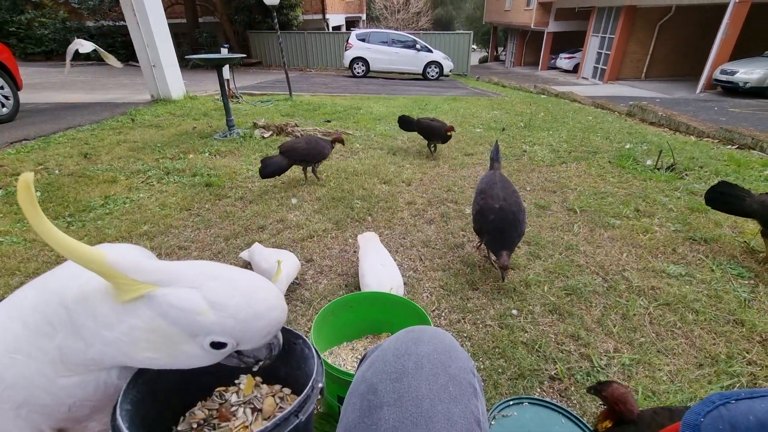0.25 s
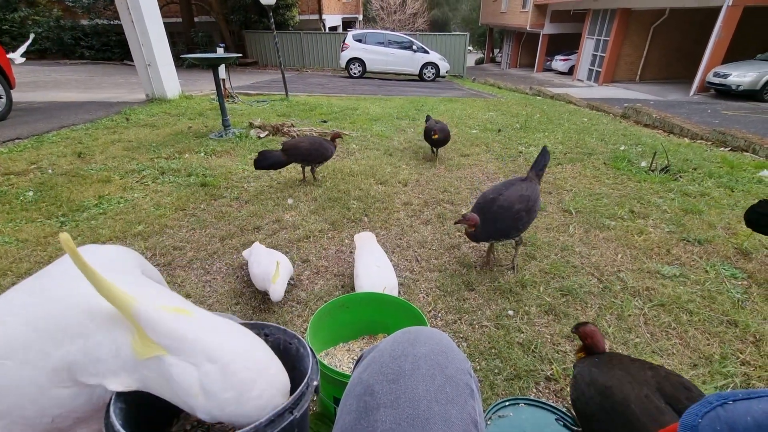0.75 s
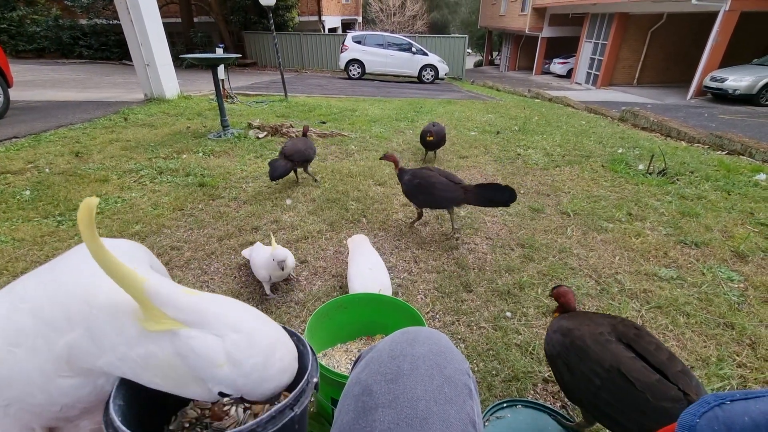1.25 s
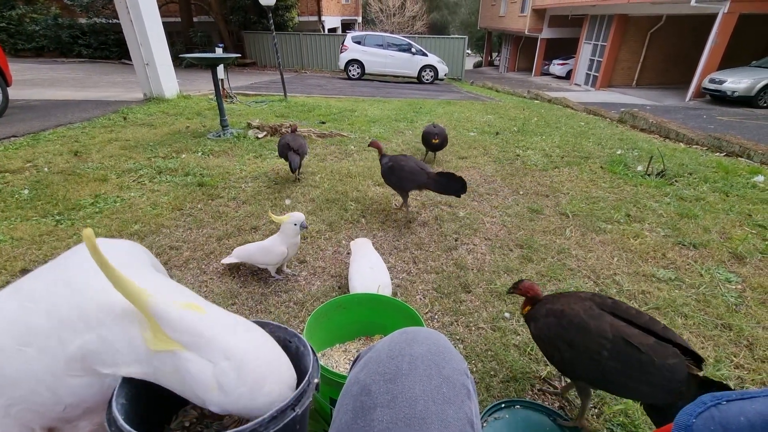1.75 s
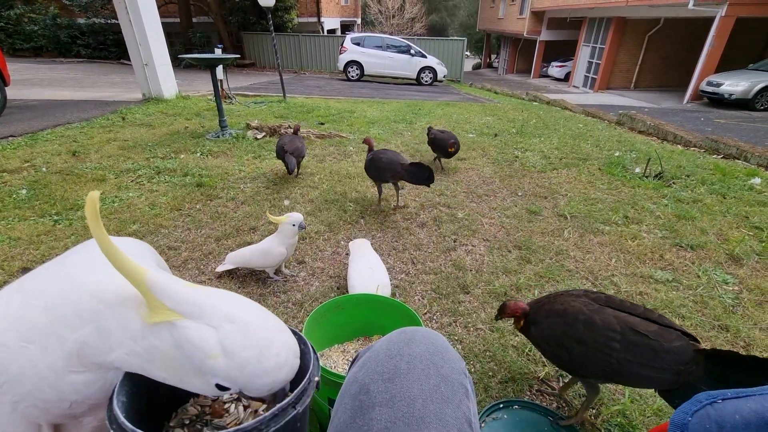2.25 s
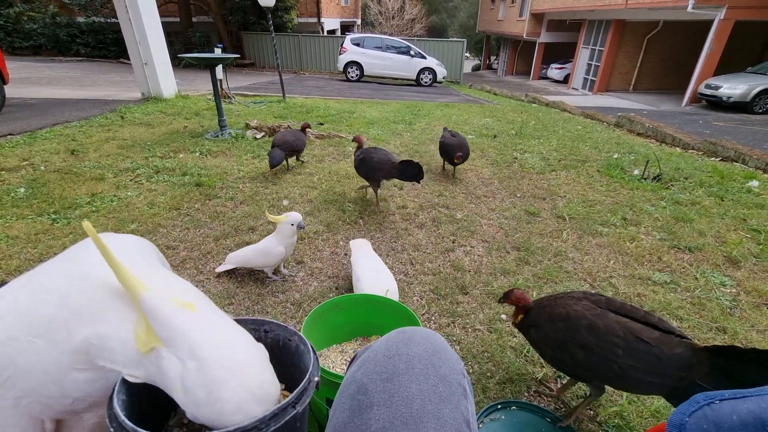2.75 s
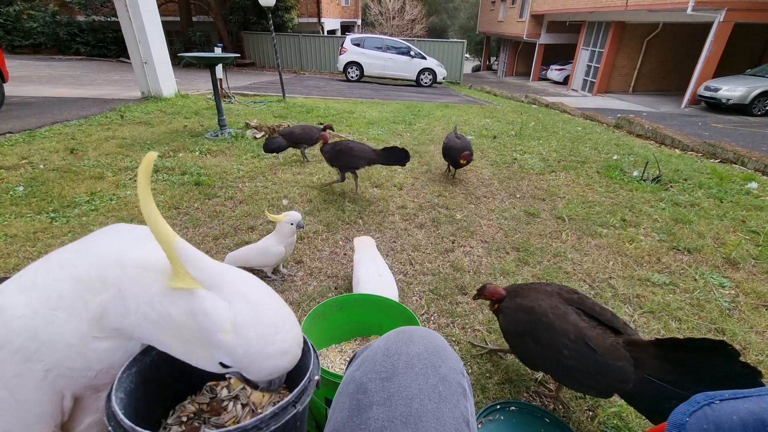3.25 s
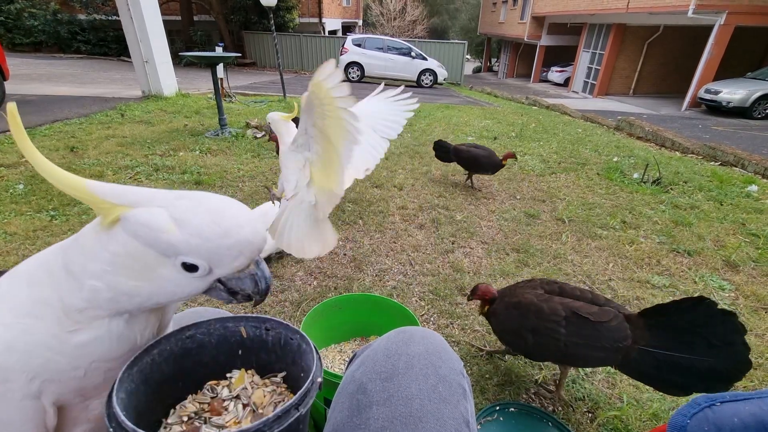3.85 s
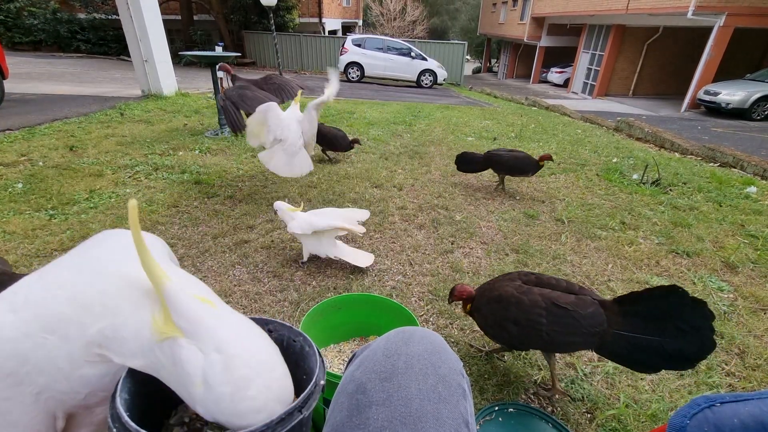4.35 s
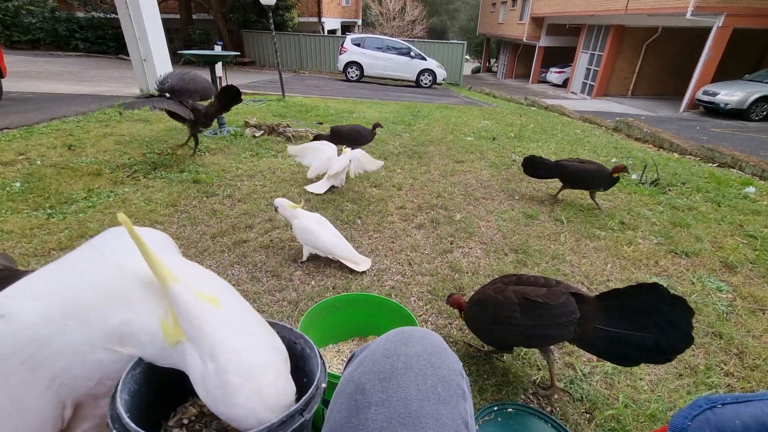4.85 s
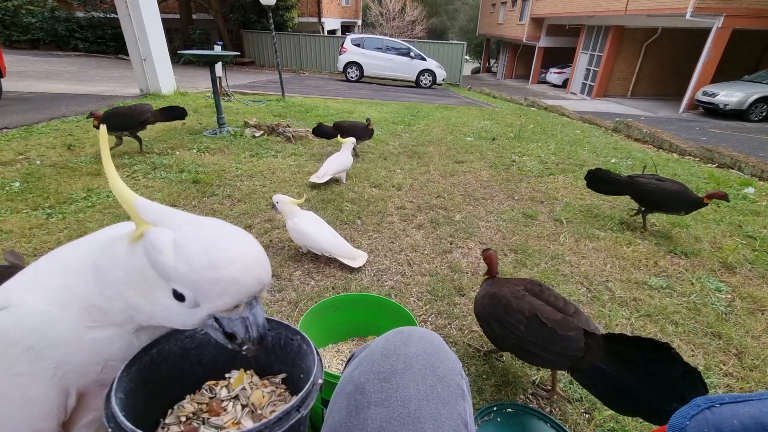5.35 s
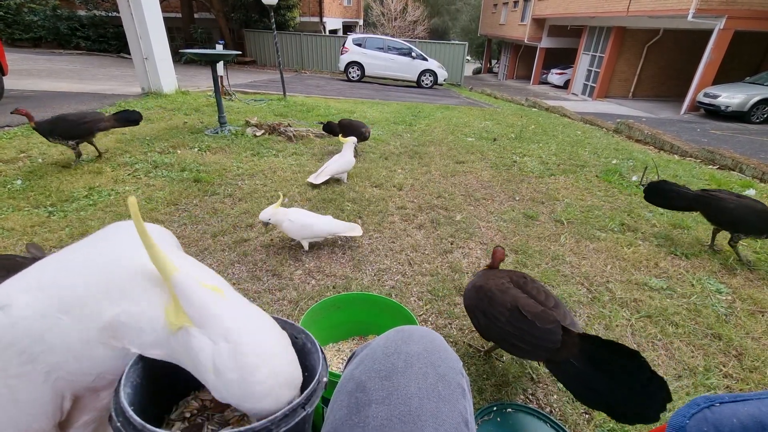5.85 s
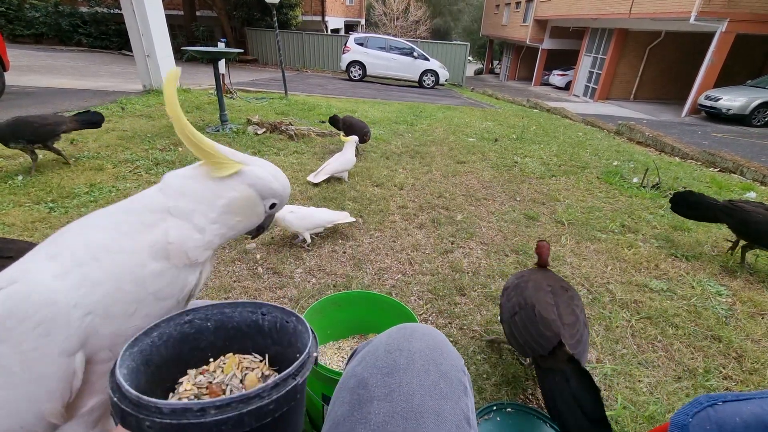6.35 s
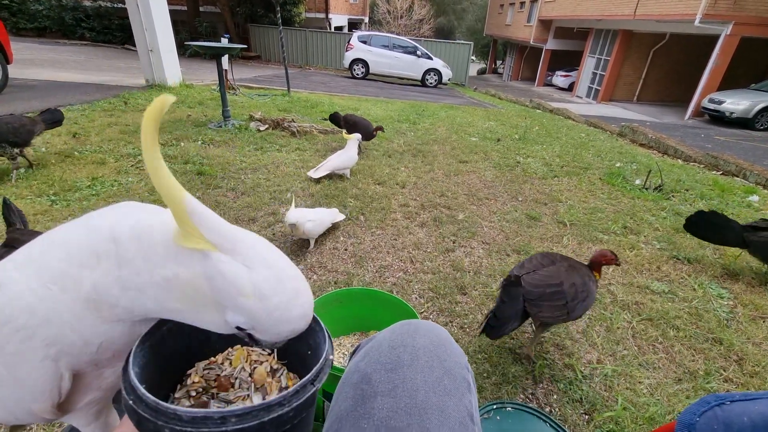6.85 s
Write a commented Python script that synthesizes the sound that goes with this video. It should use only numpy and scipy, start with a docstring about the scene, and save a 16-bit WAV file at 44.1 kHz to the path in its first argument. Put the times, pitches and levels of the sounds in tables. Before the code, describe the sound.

Sharp irregular beak clicks and splitting husks very near, brief seed rustles, a short wing flutter, distant hoarse parrot calls and low traffic rumble.

```python
"""A garden between houses: close by, a cockatoo cracks seeds and digs through a plastic bucket of them.
Cracks are bursts of noise ringing the beak or husk; digging is countless tiny seed knocks; bumps ring the bucket.
Another cockatoo flaps off across the lawn, made of rustling noise and soft puffs of air.
Birds screech and whistle in gliding tones, echoed by the houses.
Distant traffic rumbles underneath as shaped noise, with an engine drone and a faint machine whine."""
import sys
import numpy as np
from scipy import signal
from scipy.fft import rfft, irfft, next_fast_len
from scipy.io import wavfile

SR = 44100
rng = np.random.default_rng(int(sys.argv[2]) if len(sys.argv) > 2 else 0)


def transcribe(u):
    """Save the signal u as a 16-bit wav file named by the first command-line argument.

    u: samples, shape (n,) or (channels, n), limited to [-1, 1]; the rate is SR.
    q: integer samples, one column per channel.
    """
    v = np.clip(np.atleast_2d(u).T, -1, 1)
    q = np.round(v * 32767).astype(np.int16)
    wavfile.write(sys.argv[1], SR, q)


N = 312669
TIME = np.arange(N) / SR


def from_db(db):
    """Turns decibels into a gain."""
    return 10 ** (np.asarray(db) / 20)


def rms_one(x):
    """Scales a sound to an average strength (RMS) of 1."""
    return x / np.sqrt(np.mean(x ** 2) + 1e-20)


def level(rows):
    """Gain over time, drawn between rows of time and level."""
    return from_db(np.interp(TIME, *np.transpose(rows)))


def at_hz(points, hz):
    """Reads a spectrum in dB along a log-frequency axis."""
    corner, db = np.transpose(points)
    return np.interp(np.log(hz + 1), np.log(corner), db)


def colour(x, spectrum):
    """Shapes a steady sound by a spectrum."""
    size = next_fast_len(N)
    hz = np.arange(size // 2 + 1) * SR / size
    shaped = rfft(x, size) * from_db(at_hz(spectrum, hz))
    return irfft(shaped, size)[..., :N]


def resonate(x, hz, width_hz):
    """Keeps a band around one pitch, with steep skirts, like a broad resonance."""
    edges = np.clip([hz - width_hz / 2, hz + width_hz / 2], 15, .48 * SR)
    return signal.sosfilt(signal.butter(2, edges, "band", fs=SR, output="sos"), x)


def drift(rate):
    """Chance wandering with a spread of 1, given new values `rate` times a second."""
    knots = rng.standard_normal(4000)
    return rms_one(np.interp(TIME * rate, np.arange(len(knots)), knots))


def add(track, s, sound):
    """Mixes a short sound into a track at a time in seconds."""
    start = max(round(s * SR), 0)
    track[..., start:start + sound.shape[-1]] += sound[..., :N - start]


def swell(s, half_s):
    """A bell-shaped rise and fall about a moment."""
    return np.exp(-.5 * np.minimum(np.abs(TIME - s) / half_s, 10) ** 2)


def panned(x, pan_db):
    """Makes a distant source louder on one side; pan_db is left minus right."""
    return x * from_db([[pan_db / 2], [-pan_db / 2]])


MIC_LAG_MS = 0.3244


def near(x, pan_db):
    """Places a close source: the right side hears it a moment later; pan_db is left minus right."""
    left, right = np.broadcast_to(x, (2, N))
    late_right = np.interp(TIME - MIC_LAG_MS / 1000, TIME, right)
    return np.array([left * from_db(pan_db / 2), late_right * from_db(-pan_db / 2)])


def echoes(x, t60, gap_s, top_hz):
    """Scattered reflections from walls and ground: dulled, fading 60 dB in t60 seconds, unlike on each side."""
    t = TIME[:SR]
    fade_in = np.clip(t / gap_s - 1, 0, 1)   # nothing comes back before the gap
    tail = rng.standard_normal((2, SR)) * from_db(-60 * t / t60) * fade_in
    tail /= np.sqrt(np.sum(tail ** 2) / 2)
    dull = signal.sosfilt(signal.butter(2, min(top_hz, .45 * SR), fs=SR, output="sos"), x + 1e-18)
    return signal.fftconvolve(dull[None], tail, axes=1)[:, :N]


# the air of the street, strongest in the bass: [pitch_hz, level_db per Hz]
STREET_SPECTRUM = [(13, -53), (22, -16), (48, -6), (92, -1.5), (143, -9.5), (229, -9), (263, -10.5),
                   (366, -13), (469, -13.5), (1270, -23.5), (1670, -30.5), (2740, -33), (4030, -48.5),
                   (6100, -49.5), (16000, -91)]
# how much the two sides of the street differ: [pitch_hz, difference_db relative to the shared part]
STREET_WIDTH = [(30, -11), (90, -14.5), (200, -14.5), (380, -4), (700, 2), (1290, 5), (2380, 1.5),
                (4400, 1), (15000, 8)]
# engines droning far off, before drone_db is added: [time_s, level_db]
DRONE_LEVELS = [(0, -33), (.5, -40), (1.2, -41.5), (1.9, -39.5), (2.3, -44), (2.7, -51), (3.5, -41),
                (4.3, -53), (4.7, -60), (5.9, -46), (7.09, -45)]
STREET_DB = -41   # the shared part of the traffic wash, before the left-right balance


def street(drone_db, whine_db):
    """Wide traffic noise, far engines heard as narrow bands of noise, and a thin wavering whine."""
    mid, side, engines = rng.standard_normal((3, N))
    mid = colour(mid, STREET_SPECTRUM)
    side = colour(colour(side, STREET_SPECTRUM), STREET_WIDTH)
    both_sides = (mid + side * [[1], [-1]]) / np.std(mid)
    wash = from_db(STREET_DB + .5 * drift(5)) * both_sides
    hum = resonate(engines, 65.0, 3.8) + 0.26 * resonate(engines, 88.6, 39.0)
    drone = from_db(drone_db) * level(DRONE_LEVELS) * rms_one(hum)
    whine = from_db(whine_db) * rms_one(resonate(rng.standard_normal((2, N)), 1246, 4.1))
    return (wash + drone + whine) * from_db([[-.7], [.7]])   # a little louder on the right


# the beak digging into the seeds: [start_s, length_s, level_db]
DIGS = [(0.709, 0.011, -46.5), (0.853, 0.0085, -39.5), (2.059, 0.0099, -50.5), (2.921, 0.018, -43.5),
        (2.96, 0.062, -49.5), (3.204, 0.011, -46), (4.346, 0.014, -41), (5.065, 0.0066, -50),
        (5.88, 0.21, -56.5), (6.06, 0.015, -45.5), (6.13, .025, -42), (6.106, 0.018, -33),
        (6.17, 0.082, -38), (6.295, 0.066, -59.5)]
DIG_ATTACK_S, DIG_RELEASE_S = 0.0099, 0.016
SETTLE_DB, SETTLE_S = -15, 0.07   # disturbed seeds go on sliding after a dig
RESTING_DB = -70   # the bird shifting on the rim between digs


def digging():
    """How hard the seeds are stirred: each dig swells, holds and stops, then the seeds settle."""
    power = from_db(RESTING_DB) ** 2
    for s, length, db in DIGS:
        before, after = np.clip(s - TIME, 0, 1), np.clip(TIME - s - length, 0, 2)
        settling = from_db(SETTLE_DB) * np.exp(-after / SETTLE_S)
        release = np.maximum(np.exp(-after / DIG_RELEASE_S), settling)
        power = power + (from_db(db) * np.exp(-before / DIG_ATTACK_S) * release) ** 2
    return np.sqrt(power)


# overall tone of the moving seeds: [pitch_hz, level_db per Hz]
SEED_SPECTRUM = [(300, 14.5), (700, 4.5), (1400, -4), (2500, 7), (4200, 5.5), (6500, 4), (9500, -14.5),
                 (12000, -1.5), (15000, -8)]


def husks(per_s, spread_db, clump_db, rub, count):
    """Seeds knock together over a steady rub; each kind of seed ticks at a pitch of its own."""
    out = np.zeros((2, N))
    for hz in np.geomspace(400, 15000, count):
        sizes = from_db(spread_db * np.minimum(rng.exponential(1, N), 3)) * rng.choice([-1, 1], N)
        hits = sizes * (rng.random(N) < per_s / SR)
        knocks = rms_one(hits * (1 + 6 * rng.standard_normal((2, N))))   # strengths differ on each side
        out += resonate(knocks + rub * rng.standard_normal((2, N)), hz, 0.3 * hz)
    return rms_one(colour(out, SEED_SPECTRUM)) * from_db(clump_db * drift(200))


def nibbling(db):
    """Tongue and beak roll a seed about with faint, irregular ticks: tiny bursts of noise."""
    ticks = (rng.random(N) < 12 / SR) * from_db(rng.uniform(-9, 2, N))   # about 12 a second
    fade = np.exp(-1000 / (1.2 * SR))   # each dies away over 1.2 ms
    scrapes = signal.lfilter([1], [1, -fade], ticks + 1e-18) * rng.standard_normal(N)
    return from_db(db) * (resonate(scrapes, 6000, 2400) + .15 * resonate(scrapes, 14000, 3600))


def sharp_burst(hz, width_hz, burst_ms, ring_db, ring_ms, unlike, onset_ms, lead_s):
    """A sharp burst of noise that dies within milliseconds and rings one resonance."""
    ms = (TIME[:2000] - lead_s) * 1000
    onset, after = np.exp(np.minimum(ms, 0) / onset_ms), np.maximum(ms, 0)
    force = onset * (np.exp(-after / burst_ms) + from_db(ring_db) * np.exp(-after / ring_ms))
    chance = rng.standard_normal((3, len(ms)))   # one shared noise, then one for each side
    snap = resonate(force * (chance[0] + unlike * chance[1:]), hz, width_hz)
    window = .005 * SR   # every burst gets the energy of a level of 1 held for 5 ms
    return snap * np.sqrt(window / np.sum(snap ** 2, axis=1, keepdims=True))


# what a clack of the beak rings with: thud, knock, rattle, click, sizzle:
# [pitch_hz, width_hz, level_db, left_minus_right_db, right_lag_ms]
BEAK_MODES = [(620, 520, -0.5, 2, 0.44), (1916, 490, -5, -7.5, 0.32), (3200, 820, -9.5, -3, 0.21),
              (6230, 1590, -0.5, -1.5, 0.22), (14540, 4200, -7, -1, .29)]
# the beak closing on a seed: [start_s, level_db, brightness_db per octave, extra_knock_db as the mandibles meet]
CLACKS = [(0.1318, -28, 0.8, 2.5), (0.3754, -31.5, 0.6, -6), (.7156, -32, -2, 3), (0.828, -26.5, 1.2, -0.5),
          (1.1633, -42, -1, 2), (1.1773, -33.5, -1.6, 0), (1.187, -42, -1, 4), (1.2416, -48.5, 1, 13),
          (1.3588, -32.5, -2.5, -3), (1.4949, -35, -0.5, 0.5), (2.1691, -39, -4, 0), (2.7569, -47, -2, -4),
          (3.191, -45, 1, 0), (3.2029, -34, 0.9, -12), (3.2135, -37, 0.5, 0.5), (3.7967, -36.5, 1, -5),
          (3.8011, -35.5, 2, -4), (4.347, -33, 1, -4), (4.359, -38.5, 2, 9), (5.2629, -35, 2, 2),
          (5.2957, -34.5, .5, -0.5), (5.3032, -39, 0.5, -6), (5.4957, -49, 8, 19.5), (5.5103, -53, 10.5, 7),
          (5.6469, -39, 2, -1), (6.22, -34.5, -2, 3.5), (6.658, -28.5, 2.5, 7.5), (6.8504, -27.5, 0, 8.5),
          (6.859, -38, 2.5, 1), (6.9893, -35.5, -3, 10), (7.065, -49.5, -5, -2)]
# husks splitting: [start_s, level_db, pitch_hz]
SPLITS = [(0.7142, -39, 3100), (0.8286, -16.5, 3060), (0.847, -38, 3200), (1.1775, -44, 3300),
          (1.2417, -29, 4500), (2.9876, -34.5, 3360), (3.039, -41, 2720), (4.346, -35, 3200),
          (4.3575, -38, 3200), (5.2626, -25, 5770), (5.296, -43, 3000), (5.688, -39.5, 4130),
          (6.101, -36, 4450), (6.1763, -30, 4130), (6.1805, -28.5, 5000)]
KNOCK_MODE = 1   # which beak mode, counting from 0, takes the extra knock
BITE_MS, TILT_PIVOT_HZ = 0.83, 2250   # how fast a bite dies; brightness tilts the modes about this pitch
SPLIT_WIDTH, SPLIT_MS, SPLIT_PAN_DB, SPLIT_LAG_MS = 0.24, 1.6, -3.5, 0.11   # width as a share of the pitch
SPLINTER_DB, SPLINTER_WIDTH = -9, 0.82   # the broad crunch that goes with every split


def cracks(ring_db, ring_ms, unlike, onset_ms):
    """A clack rings all the beak's modes, brighter ones favouring the high modes; a husk rings at its own pitch."""
    out, rings = np.zeros((2, N)), []
    lead_s = .003   # short lead before each crack
    for s, db, brightness, knock_db in CLACKS:
        for k, (hz, width_hz, mode_db, pan_db, lag_ms) in enumerate(BEAK_MODES):
            tilt_db = brightness * np.log2(hz / TILT_PIVOT_HZ)
            ring_level_db = db + mode_db + tilt_db + knock_db * (k == KNOCK_MODE)
            rings.append((s, ring_level_db, hz, width_hz, BITE_MS, pan_db, lag_ms))
    for s, db, hz in SPLITS:
        for part_db, width in ((0, SPLIT_WIDTH), (SPLINTER_DB, SPLINTER_WIDTH)):
            rings.append((s, db + part_db, hz, width * hz, SPLIT_MS, SPLIT_PAN_DB, SPLIT_LAG_MS))
    for s, db, hz, width_hz, burst_ms, pan_db, lag_ms in rings:
        left, right = sharp_burst(hz, width_hz, burst_ms, ring_db, ring_ms, unlike, onset_ms, lead_s)
        add(out[0], s - lead_s, from_db(db + pan_db / 2) * left)
        add(out[1], s - lead_s + lag_ms / 1000, from_db(db - pan_db / 2) * right)
    return out


OVERTONE_PITCH_HZ, OVERTONE_FALL_DB = 3000, 20   # loss of overtones per octave above this pitch


def notes(rows, waver, flutter_db, octave_db, third_db):
    """Gliding notes with weak overtones, purer when high; trembling pitch and level make them hoarse."""
    out, tremor, flutter = np.zeros(N), drift(500), drift(120)
    for s, length, start_hz, middle_hz, end_hz, db in rows:
        u = np.linspace(0, 1, int(length * SR))   # progress through the note
        span = slice(int(s * SR), int(s * SR) + len(u))
        pitch = np.polyval(np.polyfit([0, .5, 1], [start_hz, middle_hz, end_hz], 2), u)
        phase = 2 * np.pi * np.cumsum(pitch * (1 + waver * tremor[span])) / SR
        octaves_up = max(np.log2(middle_hz / OVERTONE_PITCH_HZ), 0)
        overtones = from_db(octave_db - OVERTONE_FALL_DB * octaves_up)
        tone = np.sin(phase) + overtones * (np.sin(2 * phase) + from_db(third_db) * np.sin(3 * phase))
        rise_and_fall = np.abs(np.sin(np.pi * u)) ** .7
        add(out, s, from_db(db + flutter_db * flutter[span]) * tone * rise_and_fall)
    return out


# clear whistles: [start_s, length_s, start_hz, middle_hz, end_hz, level_db]
WHISTLES = [(.196, 0.14, 2550, 2885, 2950, -49.5), (1.789, .19, 4252, 4642, 4337, -48.5),
            (1.849, 0.0545, 4800, 4620, 4720, -44), (2.18, 0.15, 2380, 2395, 2570, -50.5),
            (2.301, 0.16, 2454, 2686, 2780, -44.5), (5.123, .18, 2380, 2540, 2785, -54.5),
            (5.763, 0.014, 2980, 3030, 3120, -55.5), (5.855, 0.032, 3140, 3100, 2910, -44),
            (5.949, 0.015, 2960, 2990, 3060, -50)]
# hoarse parrot calls: [start_s, length_s, start_hz, middle_hz, end_hz, level_db]
SCREECHES = [(.209, 0.082, 3350, 3370, 3630, -53.5), (.29, 0.106, 4160, 4080, 4185, -47),
             (.348, 0.053, 4010, 4370, 4140, -44), (.386, 0.12, 2975, 3100, 3110, -43.5),
             (.547, 0.066, 4110, 4140, 4090, -49.5), (.566, 0.18, 2913, 3040, 3317, -44),
             (4.422, 0.046, 2310, 2700, 2630, -53), (4.453, 0.077, 2915, 2847, 2810, -41.5),
             (4.527, .14, 2785, 3037, 3340, -44), (4.737, 0.082, 2575, 2436, 2490, -49.5),
             (4.737, 0.13, 3930, 4100, 4350, -50.5), (4.823, 0.11, 2746, 2812, 2820, -42)]


def birds(screech_pan_db, whistle_pan_db, rasp, rasp_hz, echo_db, echo_pan_db):
    """Hoarse calls, roughened by fast noise in their level, and clear whistles hang on between the houses."""
    roughness = 1 + rasp * rms_one(resonate(rng.standard_normal(N), rasp_hz, 1.9 * rasp_hz))
    screeches = roughness * notes(SCREECHES, waver=0.01, flutter_db=3.5, octave_db=-11, third_db=-23)
    whistles = notes(WHISTLES, waver=0.0064, flutter_db=2.4, octave_db=-28, third_db=-9)
    direct = panned(screeches, screech_pan_db) + panned(whistles, whistle_pan_db)
    echoed = echoes(screeches + whistles, t60=1.0, gap_s=0.0061, top_hz=8500)
    return direct + from_db(echo_db) * panned(echoed, echo_pan_db)


def grains(per_s, spread_db, hiss, spectrum):
    """Countless small contacts of uneven size over a smooth rub; partly alike on both sides."""
    sizes = from_db(spread_db * np.minimum(rng.exponential(1, (3, N)), 4)) * rng.choice([-1, 1], (3, N))
    contacts = rms_one(sizes * (rng.random((3, N)) < per_s / SR))
    touches = contacts + hiss * rng.standard_normal((3, N))
    return rms_one(colour(touches[0] + 4.1 * touches[1:], spectrum))   # shared part, then each side's own


# tone of the rubbing feathers: [pitch_hz, level_db per Hz]
FEATHER_SPECTRUM = [(800, -3.5), (1800, 7.5), (3200, 10), (4500, 7.5), (7300, 12), (9500, -5), (12000, 6.5),
                    (15000, 1)]
# tone of the air pushed by the wings: [pitch_hz, level_db per Hz]
PUFF_SPECTRUM = [(60, 5), (160, 5), (330, 0), (700, -13), (1700, -6.5), (4000, -28), (12000, -47)]
# feathers rustling as the bird takes off, flies and lands: [time_s, level_db]
FLIGHT = [(3.25, -80), (3.45, -53), (3.75, -53.5), (4.05, -58), (4.3, -51), (4.65, -57.5), (4.92, -58.5),
          (5.2, -71)]
# downstrokes of the wings: [middle_s, feather_swish_db, air_puff_db]
WINGBEATS = [(3.531, -47.5, -38.5), (3.654, -47.5, -35), (3.77, -64, -51), (4.13, -60, -61),
             (4.276, -54, -45), (4.365, -39, -36.5), (4.56, -48.5, -62)]
SWISH_S, PUFF_S = 0.025, 0.02   # half lengths of a stroke's two sounds


def wings():
    """Feathers rub all through the flight; each listed downstroke swishes and pushes a puff of air."""
    swishes = sum(from_db(db) * swell(s, SWISH_S) for s, db, _ in WINGBEATS)
    puffs = sum(from_db(db) * swell(s, PUFF_S) for s, _, db in WINGBEATS)
    feathers = grains(per_s=2300, spread_db=4.5, hiss=0.9, spectrum=FEATHER_SPECTRUM)
    rustle = np.hypot(level(FLIGHT), swishes) * feathers * from_db(3.8 * drift(60))
    return rustle + puffs * rms_one(colour(rng.standard_normal(N), PUFF_SPECTRUM))


# bumps on the bucket, each mode's own level being added: [start_s, level_db]
BUMPS = [(3.488, -29.5), (4.345, -30), (4.359, -57), (6.207, -29.5), (6.221, -27.5)]
# the tones of the plastic wall: [pitch_hz, level_db, t60_s to fade by 60 dB]
BUCKET_MODES = [(197, -18, 0.045), (380, -5, 0.044), (532, -1, 0.04), (690, -19, 0.11), (1100, -4.5, 0.024)]


def bucket():
    """Each bump rings the damped plastic wall, every mode with a strength of its own."""
    out, t = np.zeros(N), TIME[:6000]
    for s, db in BUMPS:
        for hz, mode_db, t60 in BUCKET_MODES:
            fading_db = db + mode_db + rng.normal(0, 3.8) - 60 * t / t60
            add(out, s, rng.choice([-1, 1]) * from_db(fading_db) * np.sin(2 * np.pi * hz * t))
    return out


def scene():
    """The feeding bird up close and a little to the right, the rest of the garden behind it."""
    background = street(drone_db=-3.0, whine_db=-65.0)
    seeds = digging() * husks(per_s=600, spread_db=3.0, clump_db=3.0, rub=0.57, count=15)
    ticks = nibbling(db=-40)
    snaps = cracks(ring_db=-25, ring_ms=8.7, unlike=1.0, onset_ms=0.58)
    calls = birds(screech_pan_db=-10, whistle_pan_db=-17.5, rasp=0.2, rasp_hz=397,
                  echo_db=-0.5, echo_pan_db=-5)
    flight = near(wings(), pan_db=-6.0)
    feeding = snaps + near(seeds + ticks + bucket(), pan_db=-5.0)
    reflections = from_db(-19.0) * echoes(snaps[0] + seeds[0], t60=0.83, gap_s=0.0037, top_hz=6600)
    return feeding + reflections + flight + calls + background


CUTOFF_HZ = 16300


def record(dry):
    """Cuts the top steeply above the cutoff."""
    return signal.sosfilt(signal.ellip(10, .1, 70, CUTOFF_HZ, fs=SR, output="sos"), dry)


dry = scene()
out = record(dry)
transcribe(out)
```